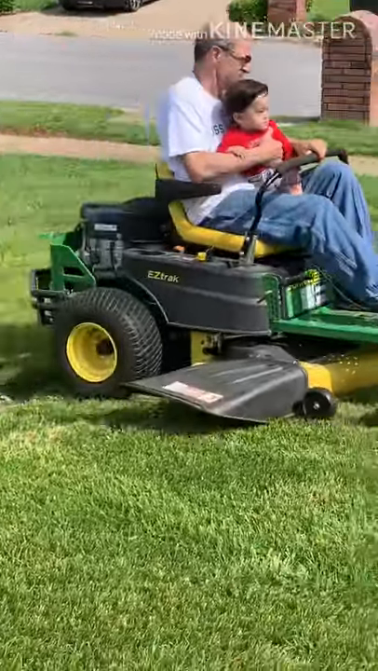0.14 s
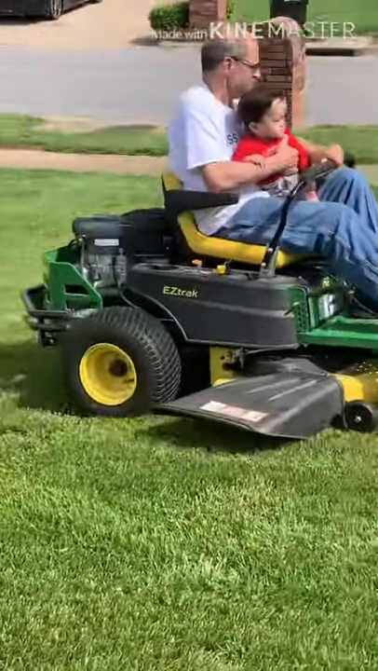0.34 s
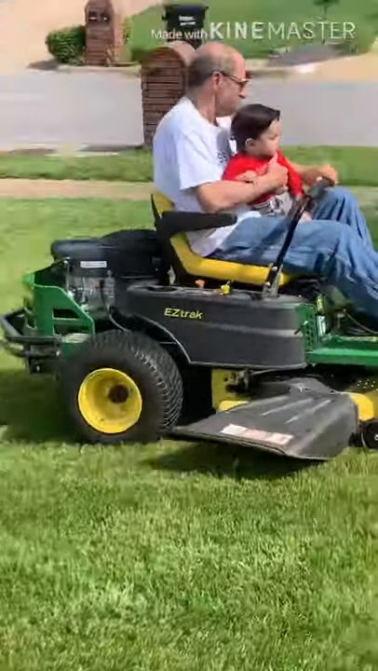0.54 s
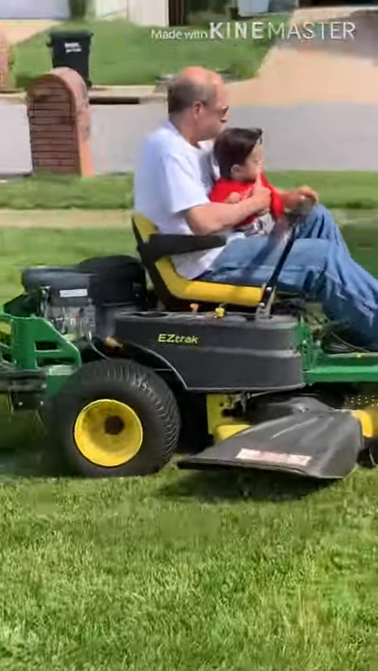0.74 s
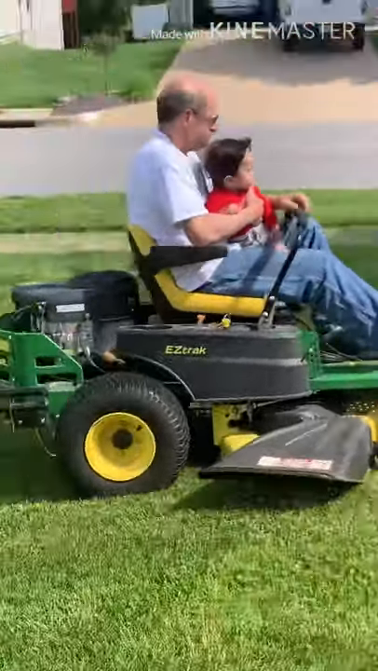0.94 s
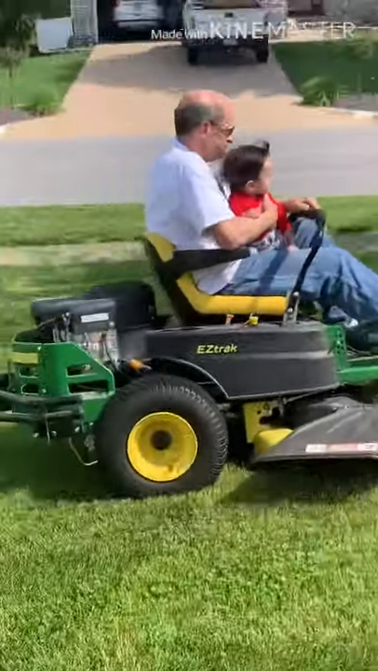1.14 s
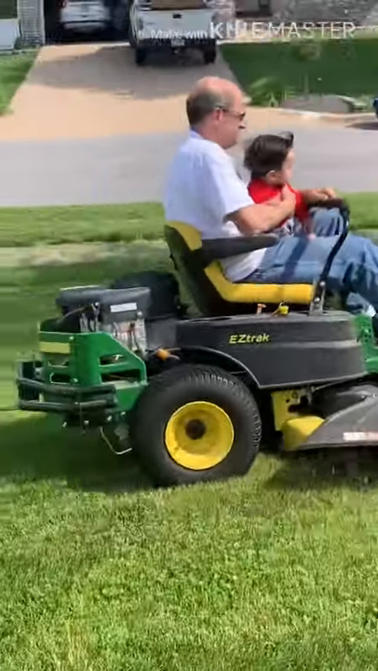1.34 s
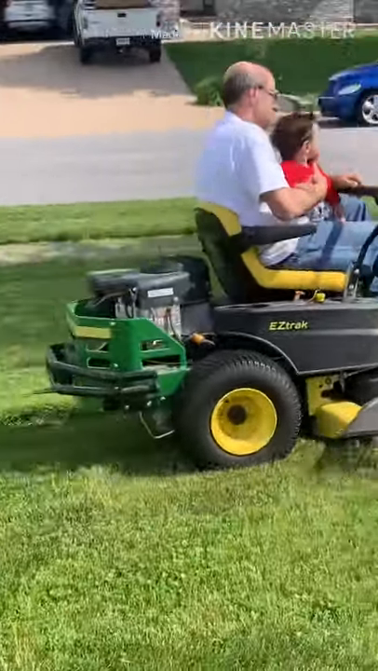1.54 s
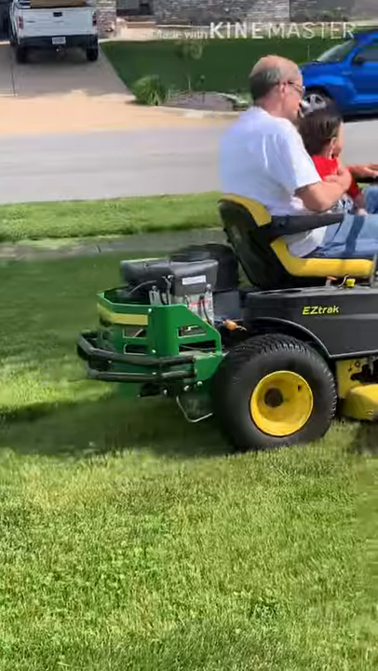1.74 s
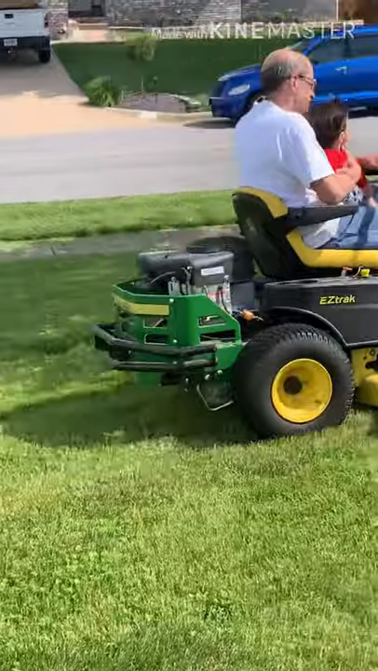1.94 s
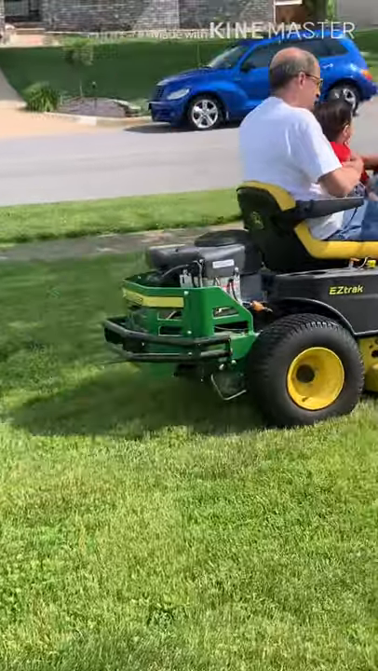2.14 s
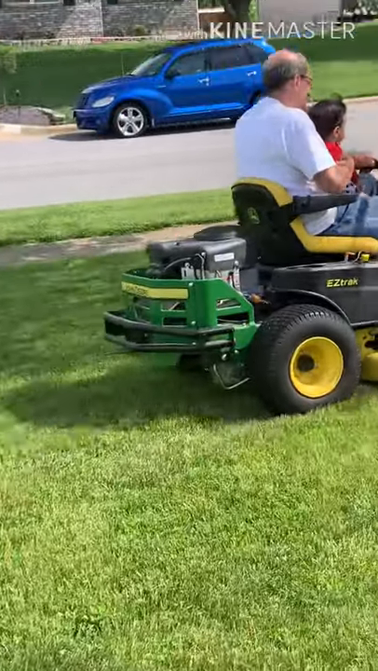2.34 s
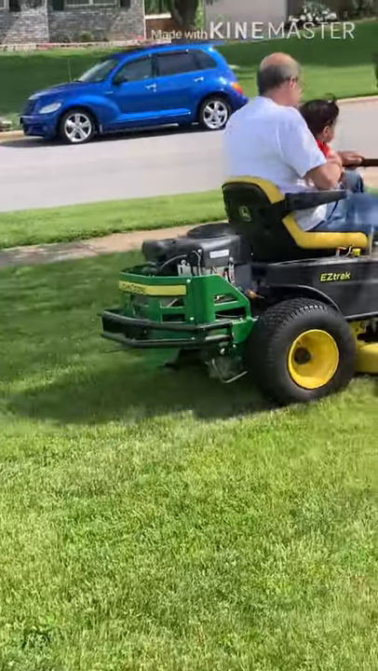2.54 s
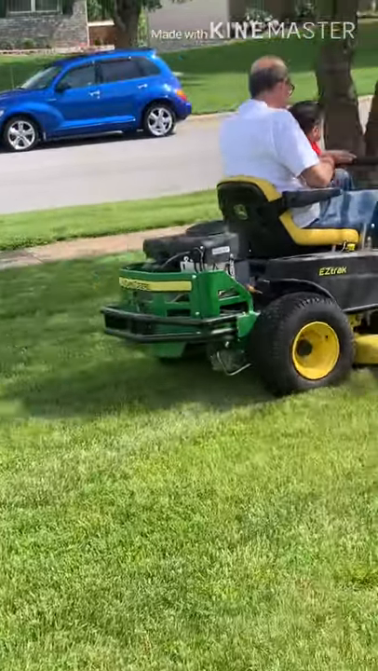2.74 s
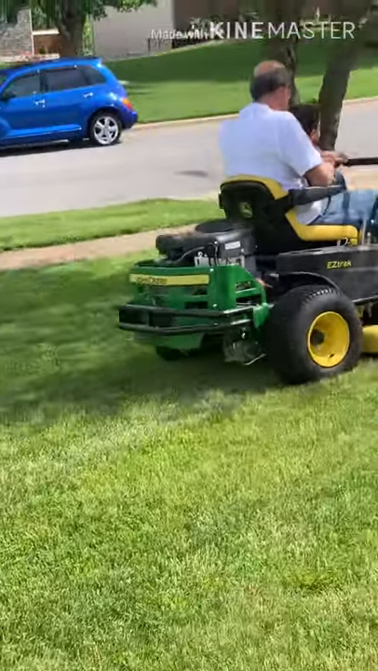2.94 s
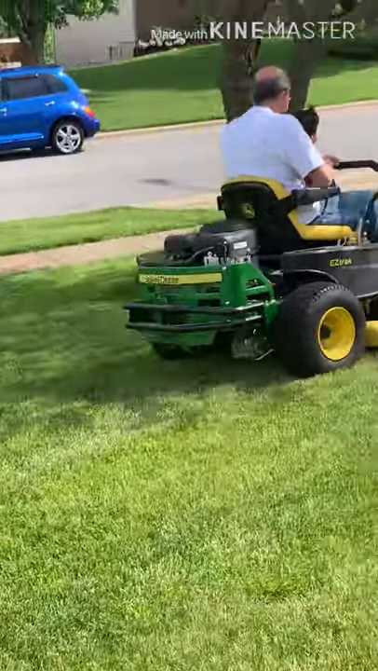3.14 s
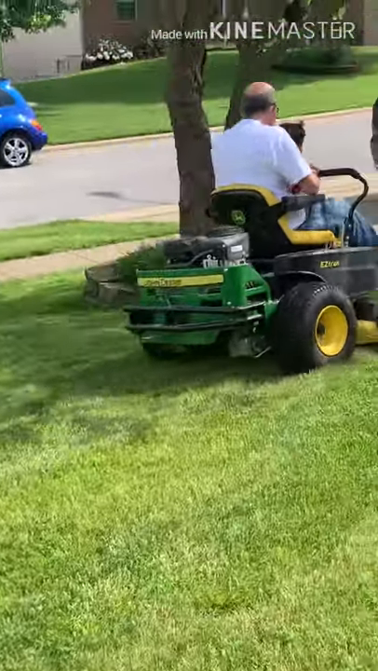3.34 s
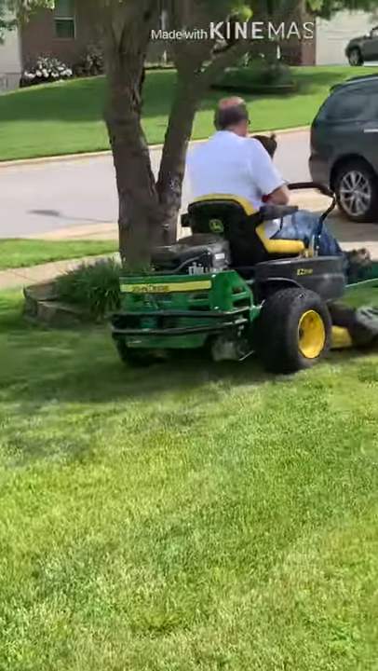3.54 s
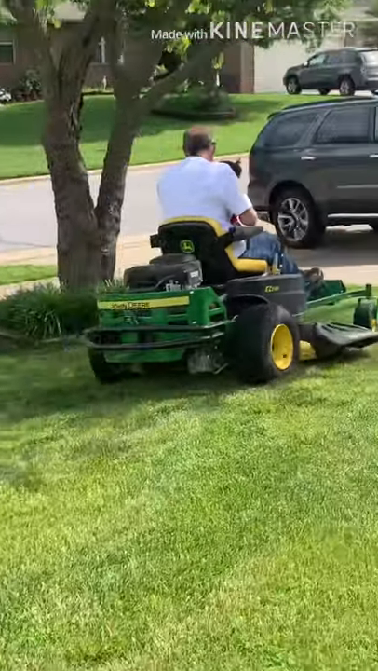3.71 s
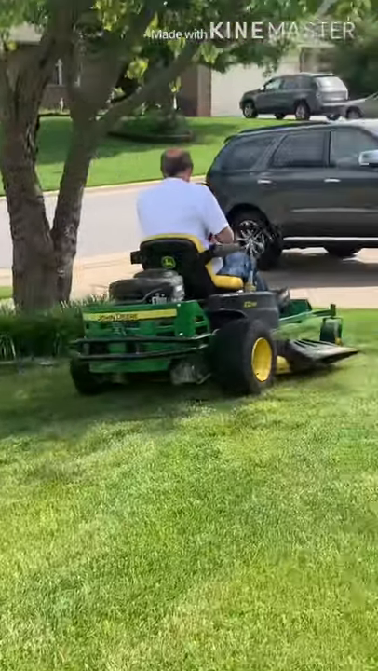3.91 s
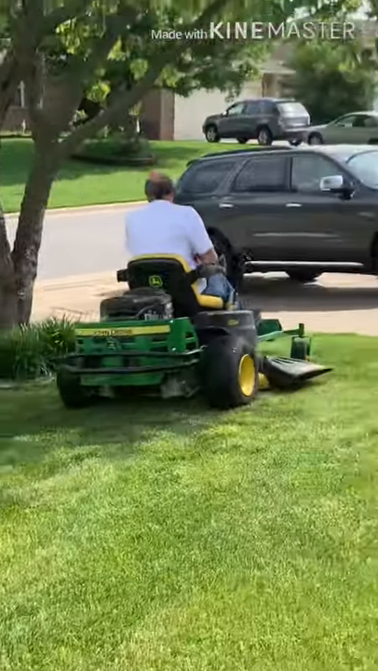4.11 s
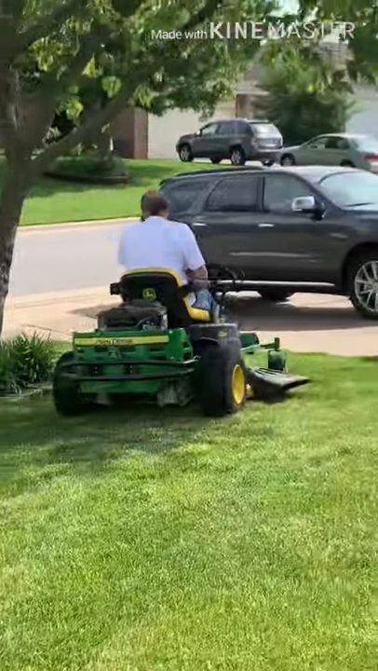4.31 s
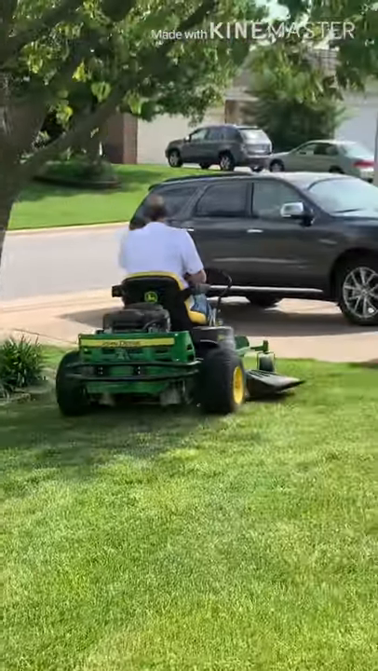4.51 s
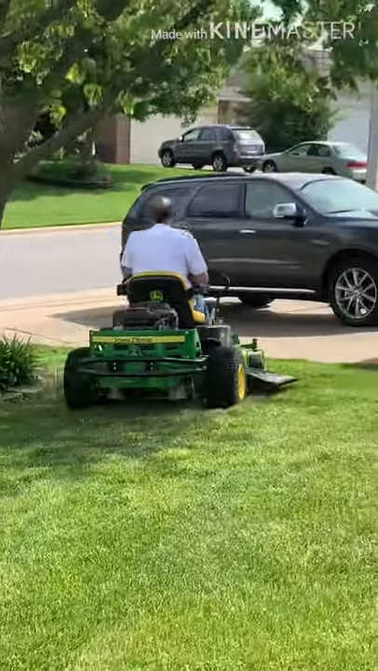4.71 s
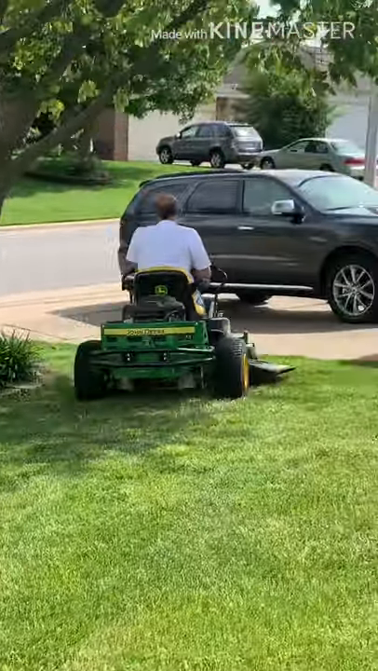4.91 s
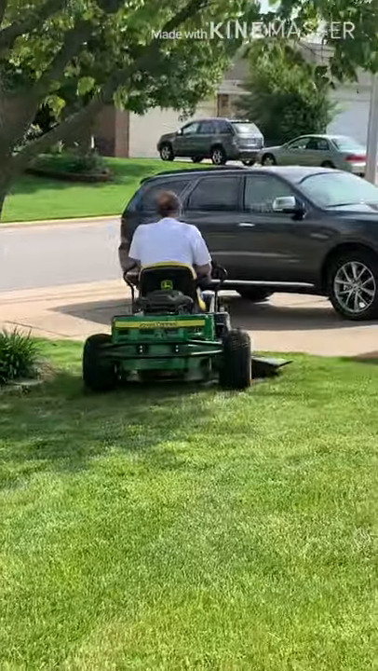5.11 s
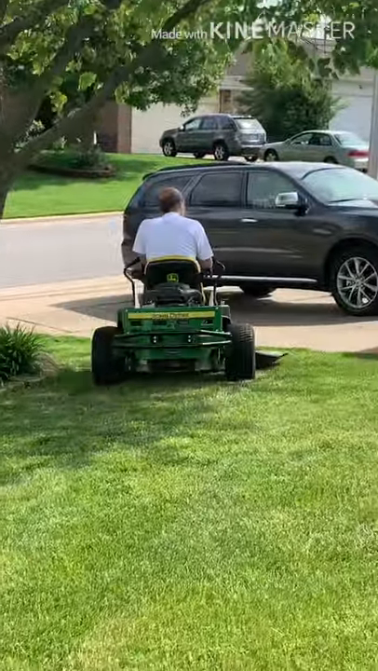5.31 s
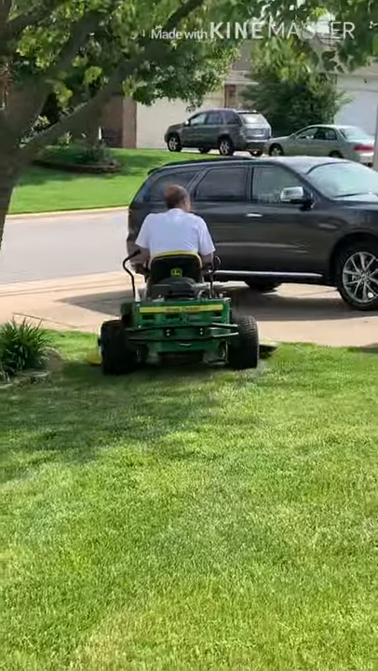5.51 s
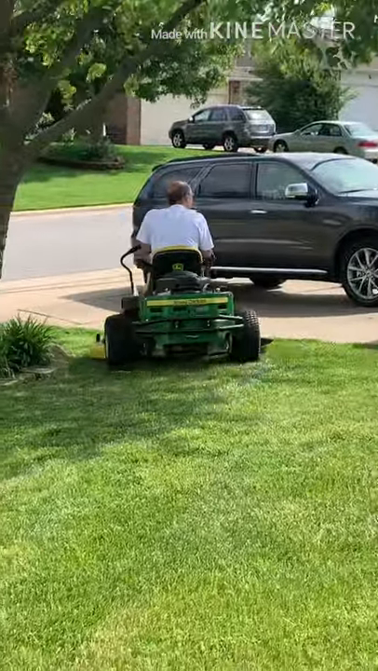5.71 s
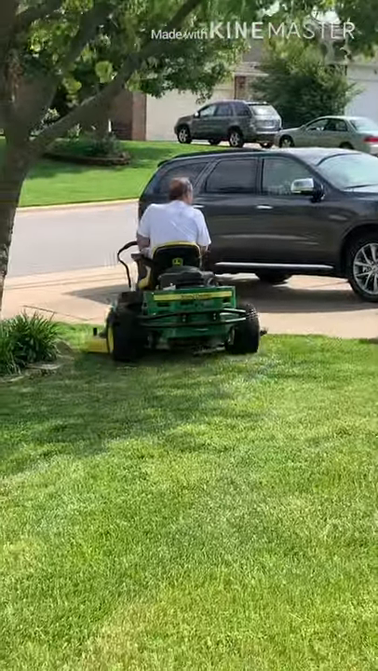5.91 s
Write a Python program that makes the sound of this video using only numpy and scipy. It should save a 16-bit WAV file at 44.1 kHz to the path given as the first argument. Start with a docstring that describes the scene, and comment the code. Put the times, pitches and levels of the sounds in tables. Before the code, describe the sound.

A riding mower is already running at full speed close to a hand-held phone on an open lawn. From 0 s it is loud and dense: a deep blade hum near 120 Hz with wavering buzzing overtones, a lower engine and exhaust drone, rasping deck air and bright, finely ticking hiss from grass and cooling air. The hiss softens by about 0.7 s and partly returns at 1 s. Around 1.4 s the engine bogs, its pitch dipping slightly and recovering; smaller sags follow near 2.4, 3.5 and 4 s. From 2 s the mower turns away, the buzz thinning and the hum shifting in character, with repetitive engine clatter more exposed. By 4 s it is clearly fainter and duller; near 4.8 s the pitch rises a touch. Soft low wind bumps hit the microphone around 2.3, 3.3, 5.3 and 5.7 s. It is still droning at 6 s.

```python
"""Lawn: a riding mower cuts grass and drives away from a hand-held phone.
Blades: partials of the pass rate, wavering one by one. Engine: exhaust partials over a crank shake.
Deck air and hiss: coloured noise puffed at each blade pass; the hiss also ticks with the valves.
Clatter: noise pattern repeated every engine cycle. Gusts: short low noise bumps on the microphone."""
import sys
import numpy as np
from scipy import signal
from scipy.fft import rfft, irfft
from scipy.io import wavfile
from scipy.ndimage import map_coordinates

SR = 44100
rng = np.random.default_rng(int(sys.argv[2]) if len(sys.argv) > 2 else 0)


def wav_out(sig):
    """Save sig, one row per channel (or a flat mono array), as 16-bit PCM at SR to the path in sys.argv[1]."""
    wavfile.write(sys.argv[1], SR, np.round(np.clip(np.atleast_2d(sig).T, -1, 1) * 32767).astype(np.int16))


N = 267246
TIME = np.arange(N) / SR
FREQ = np.maximum(np.arange(N // 2 + 1) * SR / N, 1)


def undb(db):
    """Decibels to gain."""
    return 10 ** (np.asarray(db) / 20)


def curves(table):
    """Each column of a time table, one value a sample."""
    s, *columns = np.transpose(table)
    return [np.interp(TIME, s, c) for c in columns]


def across(table):
    """Each column of a frequency table, one value a bin, interpolated in log frequency."""
    hz, *columns = np.transpose(table)
    return [np.interp(np.log(FREQ), np.log(hz), c) for c in columns]


def walk(rate_hz):
    """Smooth random curve of spread about 1 that changes about rate_hz times a second."""
    steps = rng.standard_normal(2048)
    coarse = map_coordinates(steps, [TIME[::32] * rate_hz], order=3, mode="wrap")
    return np.interp(TIME, TIME[::32], coarse)


def bump(s, length_s):
    """Gaussian rise and fall around a moment; length_s is the half-width at 1/e."""
    return np.exp(-((TIME - s) / length_s) ** 2)


def partial(turns, rough, rate_hz):
    """Tone of rms about 1 whose size and timing flutter."""
    angle = 2 * np.pi * turns
    in_phase = (1 + rough * walk(rate_hz)) * np.cos(angle)
    quadrature = rough * walk(rate_hz) * np.sin(angle)
    return (in_phase + quadrature) * np.sqrt(2 / (1 + 2 * rough ** 2))


def tint(white, colour):
    """Gives white noise of rms 1 a spectrum in dB per Hz."""
    return irfft(rfft(white) * undb(across(colour)[0]), N) * np.sqrt(SR / 2)


def noise(colour):
    """Two unrelated noises with the given spectrum in dB per Hz."""
    return tint(rng.standard_normal((2, N)), colour)


PUFF_PASSES, PUFF_SCATTER_DB = .14, 1.0  # decay in passes; scatter of puff strength


def puffs(passes, size):
    """Gain of rms 1 that jumps at each blade pass and decays, each puff of its own strength."""
    strength = undb(PUFF_SCATTER_DB * rng.standard_normal(1024))[passes.astype(int)]
    gain = 1 + size * strength * np.exp(-(passes % 1) / PUFF_PASSES)
    return gain / np.sqrt(np.mean(gain ** 2))


# governed crank speed before sags: (time [s], speed [turns/s])
CRUISE = [(0, 52.04), (1.2, 52.05), (2.1, 52.72), (4.0, 52.66), (4.8, 53.47), (6.06, 53.15)]
# thick tufts drag the engine down: (time [s], half-width [s], sag [turns/s])
TUFTS = [(1.42, .15, 1.32), (2.42, .11, .24), (3.5, .11, .5), (4.0, .13, .58)]


def crank_turns():
    """Governed crank speed minus tuft sags, integrated to turns."""
    sag_hz = sum(depth_hz * bump(s, length_s) for s, length_s, depth_hz in TUFTS)
    return np.cumsum(curves(CRUISE)[0] - sag_hz) / SR


PASSES_PER_TURN = 2.328  # before the belt offset
# belt offset of the pass rate: (time [s], offset [passes/s])
BELT = [(0, .09), (1.4, .09), (2.2, -.06), (4.3, -.06), (5, .3)]


def blade_passes(turns):
    """Belt drive: fixed ratio to the crank plus a drifting offset."""
    return turns * PASSES_PER_TURN + np.cumsum(curves(BELT)[0]) / SR


# deck air churned by the blades: (frequency [Hz], density re rush level [dB per Hz])
RUSH = [(25, -47), (45, -37), (75, -29), (130, -20.5), (200, -18), (290, -14.5), (430, -21.5), (600, -19.5),
        (830, -20.3), (1000, -24.5), (1160, -27), (1300, -25), (1500, -26.5), (1900, -27.5), (2350, -35.5),
        (3500, -39.5), (8000, -62)]
RUSH_DB, RUSH_PUFF = -32.5, 1.1


def deck_air(passes, level_db):
    """Turbulence under the deck: even low rumble, and above it a rasp at each blade pass."""
    air = noise(RUSH)
    rumble = irfft(rfft(air) / (1 + (FREQ / 600) ** 4), N)
    rush = rumble + (air - rumble) * puffs(passes, RUSH_PUFF)
    return rush * undb(0.92 * walk(14)) * undb(RUSH_DB + level_db)


HISS_DB, HISS_PUFF = -5, .27
# cut grass and cooling air: (frequency [Hz], density re hiss level [dB per Hz])
HISS = [(800, -50), (2000, -34), (2700, -30), (3200, -31.5), (4100, -30.5), (5100, -33), (6400, -32),
        (7300, -32.3), (8800, -33.2), (9200, -36), (11500, -37), (14000, -39), (15500, -44)]
# valves seating: (place in engine cycle [0-1], strength [relative])
VALVES = [(0.101, 1.0), (.42, 0.18), (0.792, 0.14)]
# hiss level: (time [s], level re HISS_DB [dB])
HISS_LEVEL = [(0, -32.5), (.5, -32.3), (.72, -35.7), (1.0, -33.6), (1.6, -35), (2.3, -35.2), (2.9, -36),
              (3.3, -36), (3.85, -37.5), (4.1, -40), (4.45, -38.8), (4.75, -39.2), (4.95, -37.6),
              (5.55, -39.2), (5.85, -37.6), (6.06, -38.6)]


def hiss(cycles, passes):
    """Grass and cooling air: two treble bands flicker apart; passes and valves add short ticks."""
    ticks = sum(strength * np.exp(-((cycles - place) % 1) / 0.11) for place, strength in VALVES)
    uneven = undb(3 * walk(60))
    air = noise(HISS)
    low_band = irfft(rfft(air) / (1 + (FREQ / 6500) ** 8), N)
    lower = low_band * undb(.3 * walk(45))
    upper = (air - low_band) * undb(1.0 * walk(70) + .5 * walk(7))
    ticking = (lower + upper) * (.9 + .33 * ticks * uneven) * puffs(passes, HISS_PUFF)
    return ticking * undb(HISS_DB + curves(HISS_LEVEL)[0])


# the rear engine turns toward the phone: clatter rises against its share of the distance loss
CLATTER_DB, CLATTER_FADE, CLATTER_RISE_DB_PER_S = -41, 0.58, 1.93
# cylinder fins, shroud and frame: (frequency [Hz], density re clatter level [dB per Hz])
CLATTER = [(100, -38), (280, -20), (520, -23), (800, -33), (1000, -31.5), (1250, -24.7), (1500, -31),
           (2200, -37), (2750, -34), (3200, -41), (6000, -43), (14000, -54)]


def clatter(cycles, level_db):
    """The same knocks recur every engine cycle, blurred by cooling-air noise."""
    pattern = rng.standard_normal((2, 1680))
    knocks = pattern[:, (cycles % 1 * pattern.shape[1]).astype(int)]
    repeat = .62  # power share of the repeating part
    mix = np.sqrt(repeat) * knocks + np.sqrt(1 - repeat) * rng.standard_normal((2, N))
    gain_db = CLATTER_DB + CLATTER_FADE * level_db + CLATTER_RISE_DB_PER_S * TIME
    return tint(mix, CLATTER) * undb(gain_db)


BLADE_DB, BLADE_FADE = -16.5, 0.66  # fade: share of the distance loss
# as the mower turns away, the hum moves from the chute to the back of the deck
TURN_S, TURN_LENGTH_S, REAR_LAG_PASSES = 2.42, .22, .47
# waver depth: base, extra at the top partial, growth; reduced for partials 1 and 2
WAVER, WAVER_AT_TOP, WAVER_GROWTH_PER_S, WAVER_HZ = .05, .6, .045, 20
# blade by the chute, then the two behind: (lead [passes], creep [passes/s], strength [gain])
BLADES = [(-.12, 0, 1), (.1, -.7, .08), (.7, .9, .08)]
# blade partials: (multiple of pass rate, level re blade level [dB])
BLADE_TONE = [(1, -2.5), (2, -6.5), (3, -2.5), (4, -11.5), (5, -15), (6, -20), (7, -22.5), (8, -28.5),
              (9, -22), (10, -24.5), (11, -26), (12, -28), (13, -27), (14, -30.5), (15, -28), (16, -32.5),
              (17, -32)]
# partials swell or thin as the mower moves:
# (time [s], half-width [s], multiple of pass rate, change [dB])
SWELLS = [(0.3, 0.17, 1, 2), (3.25, 0.36, 1, 3.5), (4.62, 0.36, 1, 5.5), (5.44, 0.64, 1, -4.5),
          (0.17, 0.37, 2, 6.5), (0.72, 0.07, 2, -7), (1.27, 0.4, 2, 9.5), (2.05, 0.17, 2, -12.0),
          (2.67, 0.42, 2, -5.5), (2.92, 0.1, 2, -9), (3.32, 0.19, 2, 5.5), (3.53, 0.08, 2, -8.5),
          (3.87, 0.09, 2, 4.5), (5.51, 0.19, 2, 5.0), (6.02, 0.08, 2, 4), (0.35, 0.33, 3, 8.5),
          (1.33, 0.4, 3, -8.5), (1.72, 0.1, 3, -12.0), (2.25, 0.09, 3, -5.5), (2.7, 0.15, 3, -10.5),
          (3.22, 0.08, 3, -8.5), (4.04, 0.26, 3, -12.0), (4.63, 0.08, 3, -9.0), (4.93, 0.1, 3, -8),
          (5.27, 0.12, 3, 2), (5.72, 0.25, 3, -7), (0.12, 0.13, 4, 6.5), (1.23, 0.16, 4, 8.5),
          (1.91, 0.12, 4, 9.5), (2.18, 0.16, 4, -9), (2.55, 0.17, 4, 5.5), (2.9, 0.16, 4, -9),
          (3.68, 0.3, 4, 8.5), (4.24, 0.14, 4, -7.0), (5.25, 0.19, 4, 7.5), (5.59, 0.12, 4, -12.0),
          (0.88, 0.2, 5, 9.0), (1.79, 0.25, 5, 7.5), (2.83, 0.11, 5, -12.0), (3.58, 0.35, 5, 7.5),
          (4.19, 0.17, 5, -12.0), (5.17, 0.22, 5, -12.0), (5.74, 0.45, 5, 3.5), (0.51, 0.35, 6, 8.5),
          (1.31, 0.37, 6, 15.0), (2.46, 0.38, 6, 15.0), (3.77, 0.2, 6, 5), (4.43, 0.08, 6, -10.5),
          (5.27, 0.12, 6, 12.0), (5.97, 0.1, 6, 8), (0.1, 0.33, 7, 14.0), (0.92, 0.37, 7, 13.0),
          (2.05, 0.48, 7, 6.5), (0.0, 0.22, 8, 16.0), (1.21, 0.16, 8, 15.5), (2.28, 0.32, 8, 13.5),
          (1.6, 0.38, 9, 6), (2.3, 0.15, 11, 6), (0.5, 0.15, 12, 5), (1.5, 0.2, 12, 6.5),
          (2.4, 0.35, 12, 5), (1.2, 0.45, 13, 4), (0.5, 0.27, 15, 3), (0.35, 0.2, 16, 9)]


def blades(passes, level_db):
    """Tips sweep past the deck wall: deep hum from the whole deck, buzz led by the chute blade."""
    sweeps = []
    for lead, creep, strength in BLADES:
        blade_turns = passes + lead + creep * TIME + 0.011 * walk(18)
        sweeps.append((blade_turns, strength * undb(0.84 * walk(32))))
    rear = 1 / (1 + np.exp((TURN_S - TIME) / TURN_LENGTH_S))
    chute_turns, chute_size = sweeps[0]
    hum = [(chute_turns, chute_size * (1 - rear)), (chute_turns - REAR_LAG_PASSES, chute_size * rear)]
    out = 0
    for k, db in BLADE_TONE:
        k = round(k)
        # deck smears each pulse; buzz is out of step with hum
        spread_turns = .04 * k * (k - 1) + .3 * (k > 1)
        heard = hum if k == 1 else sweeps
        depth = WAVER + WAVER_AT_TOP * (k / len(BLADE_TONE)) ** 2 + WAVER_GROWTH_PER_S * TIME
        depth = depth * min(k / 3, 1)
        shift_rad = depth * walk(WAVER_HZ)
        tone = sum(size * np.cos(2 * np.pi * (k * turns + spread_turns) + shift_rad)
                   for turns, size in heard)
        lift_db = sum(swell_db * bump(s, length_s)
                      for s, length_s, multiple, swell_db in SWELLS if round(multiple) == k)
        waver = (1 + depth * walk(WAVER_HZ)) / np.sqrt(1 + depth ** 2)
        edge_db = 2.1 * walk(9.8) * min(k / 12, 1) ** 2  # highest partials come and go
        out = out + undb(db + lift_db + edge_db) * waver * tone
    return np.sqrt(2) * out * undb(BLADE_DB + BLADE_FADE * level_db)


SHAKE_DB, SHAKE_FADE_DB_PER_S = -29, 1.3
# exhaust partials, changing as the outlet turns to the phone:
# (multiple of four-stroke cycle rate, rounded for pitch; level at 0 s [dB]; change [dB/s])
EXHAUST = [(3, -50, 2.5), (4, -36.5, -2.5), (5.03, -27, 0), (6, -34.5, 0), (7, -38, 0.5), (8, -37, 0.4),
           (10, -52, -1.5), (11, -51, -0.5), (12, -47, 2.06), (13, -43.5, 0.3), (17, -55, -1.5),
           (19, -45.5, 0), (21, -60, 1), (22, -42, 0), (24, -42, 0.3)]


def engine(cycles):
    """Exhaust pulses, spread in time by the muffler, over the fading shake of the crank."""
    exhaust = 0
    for k, db, change_db_per_s in EXHAUST:
        turns = round(k) * cycles + .1234 * round(k) ** 2  # muffler phase spread
        exhaust = exhaust + undb(db + change_db_per_s * TIME) * partial(turns, 0.046 * k, 6)
    shake_db = SHAKE_DB - SHAKE_FADE_DB_PER_S * TIME
    return exhaust + undb(shake_db) * partial(2 * cycles, .04, 12)


RASP_HZ, RASP_OCTAVES = 2700, 0.45
# low-treble gain, bright from the chute, later from the engine behind: (time [s], level [dB])
RASP_LEVEL = [(0, 3.5), (.35, 1.5), (.8, -2), (1.4, -1.5), (2.2, 0.5), (4.3, -1.3), (4.9, 0.8), (6.06, 1)]


def rasp(air):
    """Beamed low treble: swells and thins as the mower turns."""
    band = irfft(rfft(air) * np.exp(-(np.log2(FREQ / RASP_HZ) / RASP_OCTAVES) ** 2), N)
    return air + band * (undb(curves(RASP_LEVEL)[0]) - 1)


# flaring bands: (from [Hz], to [Hz], band width [Hz], depth [dB], rate [changes/s])
FLARES = [(900, 2200, 130, 2.2, 20), (2500, 5000, 300, 1.6, 14), (5500, 9000, 400, 1.4, 32)]


def grit(air):
    """Narrow noise bands flare independently: grit in the roar, sparkle in the hiss."""
    spectrum = rfft(air)
    for low_hz, high_hz, width_hz, depth_db, rate_hz in FLARES:
        for hz in np.arange(low_hz, high_hz, width_hz):
            band = irfft(spectrum * np.maximum(1 - abs(FREQ - hz) / width_hz, 0), N)
            flare = undb(depth_db * walk(rate_hz))
            air = air + band * (flare / np.sqrt(np.mean(flare ** 2)) - 1)
    return air


# phase between the microphone ports: (frequency [Hz], left lead [rad])
PORT_LEAD = [(50, 0), (180, -.17), (450, .55), (700, .92), (1300, -.1), (1700, 0), (2050, .9), (2500, 2.6),
             (3700, 1.6), (4900, 3.14), (6900, 6.28), (9700, 9.42), (12400, 12.57), (14700, 15.7)]
# port match: (frequency [Hz], noise likeness [0-1], left minus right [dB])
PORT_MATCH = [(60, .997, .5), (130, .995, -.8), (330, .92, .1), (680, .78, 4.4), (1200, .95, .8),
              (1900, .93, .6), (2300, .65, .6), (3500, .55, 2.7), (4900, .86, .8), (5800, .66, .8),
              (7000, .87, 1.1), (8300, .72, 1.1), (9700, .93, 1.1), (13500, .83, 1.1)]


def ports(tones, air):
    """Two ports differ in phase and level by frequency; wide-deck noise is only partly alike."""
    likeness, balance_db = across(PORT_MATCH)
    likeness = np.clip(likeness, 0, 1)
    sign = np.array([[1], [-1]])
    shared = rfft(tones) + rfft(air[0]) * np.sqrt((1 + likeness) / 2)
    apart = rfft(air[1]) * np.sqrt((1 - likeness) / 2)
    lag = np.exp(-1j * across(PORT_LEAD)[0] * np.array([[0], [1]]))
    return irfft((shared + sign * apart) * lag * undb(sign * balance_db / 2), N)


# gusts: (time [s], half-width [s], level [dB])
GUSTS = [(2.32, .05, -28.5), (3.31, .05, -32), (5.26, .07, -31.5), (5.73, .03, -33)]
# gust spectrum: (frequency [Hz], density re gust level [dB per Hz])
GUST_COLOUR = [(25, -45), (50, -22), (68, -13), (90, -20), (160, -40), (600, -90)]


def gusts():
    """Short low bumps of wind on the microphone, alike in both channels."""
    swell = sum(undb(db) * bump(s, length_s) for s, length_s, db in GUSTS)
    return swell * noise(GUST_COLOUR)[0]


# mower leaves: (time [s], distance level [dB], left minus right [dB])
PASS = [(0, 0, -0.5), (.4, -1.3, -1.5), (.75, -2.5, -1.5), (1.1, -2, -1.5), (2.2, -4, -1), (3.4, -5, -1.5),
        (4.1, -8, -2), (4.9, -9, -1.5), (6.06, -9.5, -1.5)]


def scene():
    """Engine drives blades by belt; deck sounds fade with distance; gusts bypass the ports."""
    turns = crank_turns()
    cycles, passes = turns / 2, blade_passes(turns)
    level_db, pan_db = curves(PASS)
    air = deck_air(passes, level_db) + hiss(cycles, passes) + clatter(cycles, level_db)
    tones = blades(passes, level_db) + engine(cycles)
    mower = ports(tones, grit(rasp(air)))
    return mower * undb(np.array([pan_db, -pan_db]) / 2) + gusts()


TOP_HZ = 14750


def record(dry):
    """The phone rounds the highest peaks, then low-passes at TOP_HZ."""
    rounded = dry / (1 + (dry / .96) ** 8) ** (1 / 8)
    return signal.sosfilt(signal.ellip(10, .1, 80, TOP_HZ, fs=SR, output="sos"), rounded)


dry = scene()
out = record(dry)
wav_out(out)
```